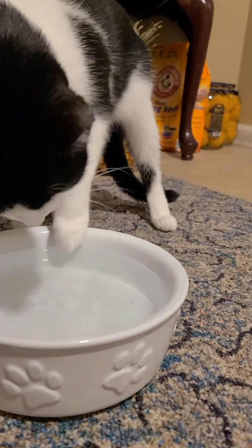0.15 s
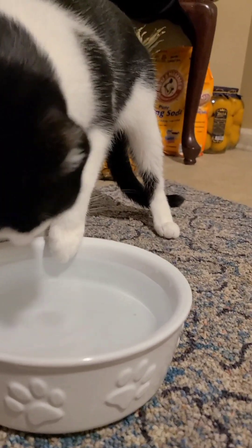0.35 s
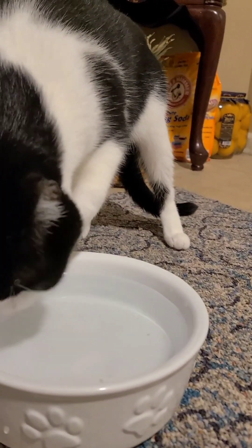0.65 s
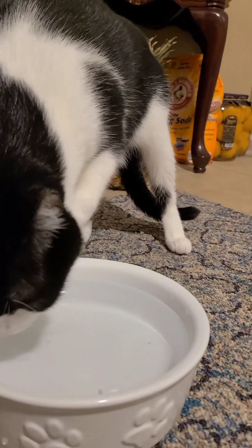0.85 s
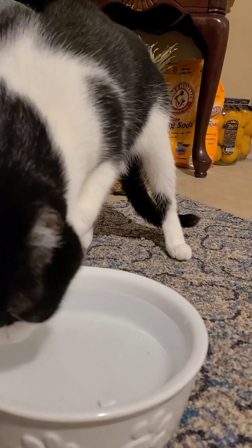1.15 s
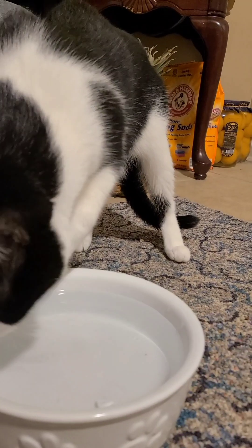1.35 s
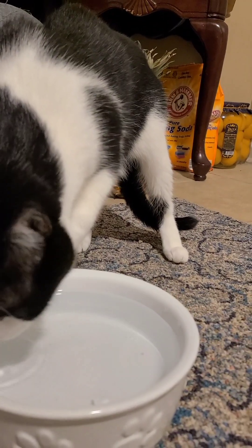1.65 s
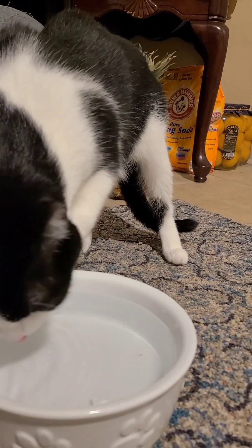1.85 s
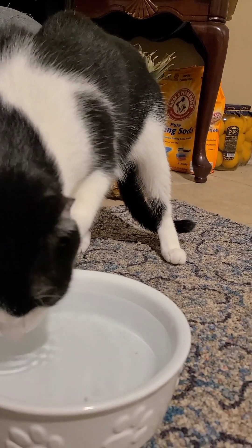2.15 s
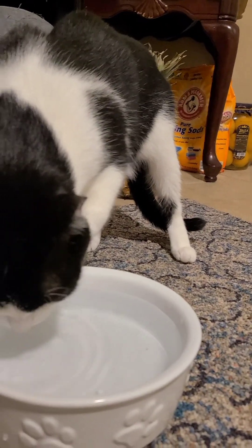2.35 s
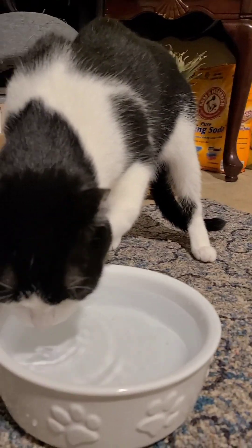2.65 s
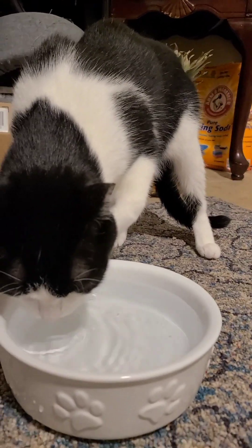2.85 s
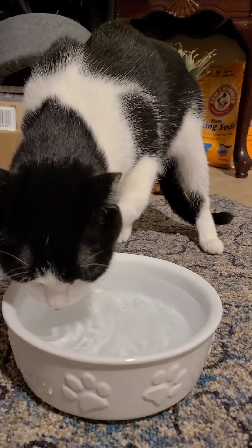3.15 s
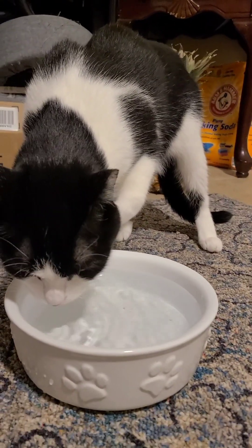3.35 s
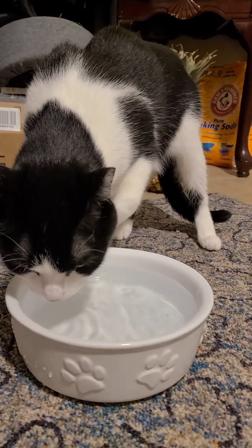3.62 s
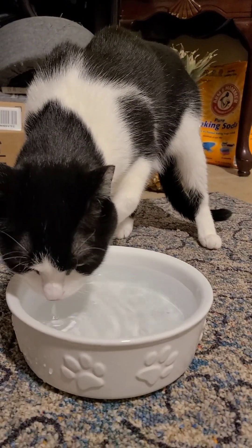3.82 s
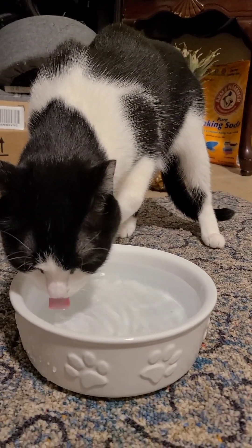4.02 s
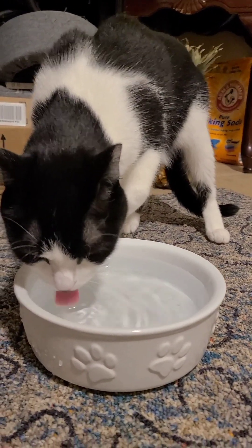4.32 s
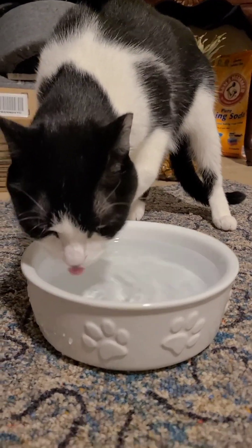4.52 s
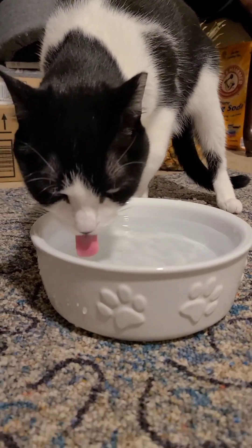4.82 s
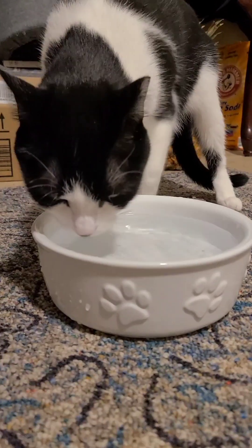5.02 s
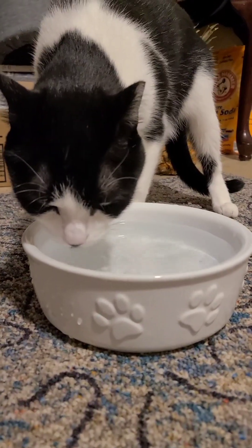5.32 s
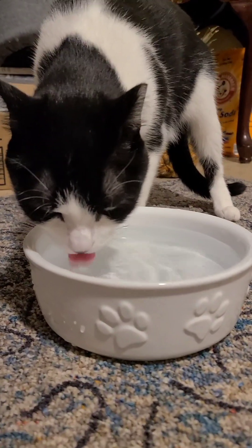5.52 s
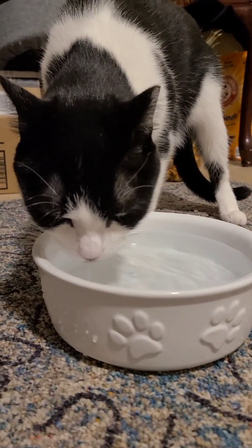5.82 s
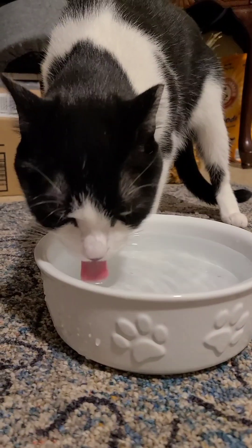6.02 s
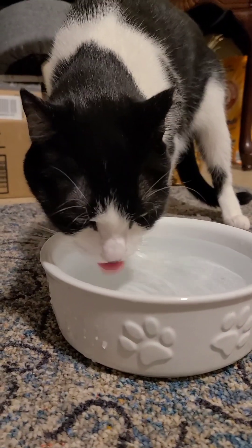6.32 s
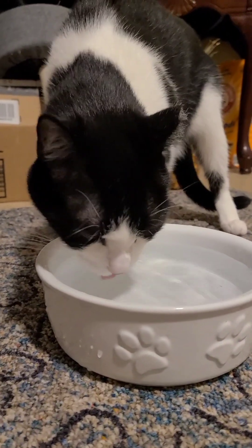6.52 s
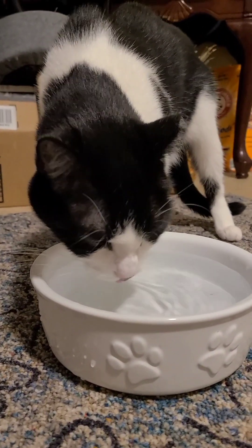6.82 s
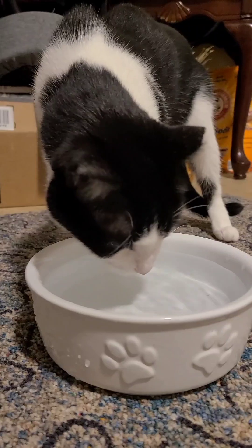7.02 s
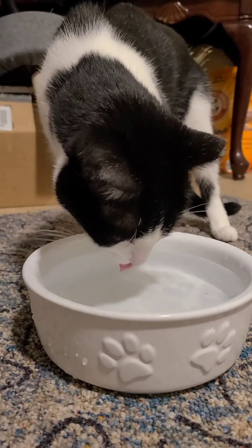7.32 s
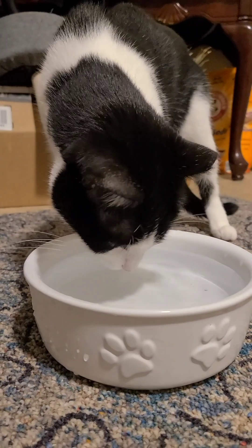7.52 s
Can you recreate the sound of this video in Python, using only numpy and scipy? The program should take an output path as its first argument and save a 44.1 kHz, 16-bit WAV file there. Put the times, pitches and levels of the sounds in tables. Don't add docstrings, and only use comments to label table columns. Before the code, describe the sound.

Steady low mains hum and soft rumble fill a quiet domestic room. Close to a stereo phone, a cat's tongue makes short wet plops a few times per second, irregular in strength. Bright drips and tiny high clicks cluster mid-way, with brief faint bowl rings and bubble burbles. A faint fan tone rises after the middle; lapping stops almost entirely in the last half second, leaving hum.

```python
import sys
import numpy as np
from scipy import signal
from scipy.fft import rfft, irfft
from scipy.io import wavfile
from scipy.ndimage import uniform_filter1d

SR = 44100
rng = np.random.default_rng(int(sys.argv[2]) if len(sys.argv) > 2 else 0)


def pcm_store(signal):
    levels = np.round(np.clip(np.atleast_2d(signal), -1, 1) * 32767)
    wavfile.write(sys.argv[1], SR, levels.astype(np.int16).T)


def voltage_ratio(decibels):
    exponent = np.asarray(decibels, float) / 20
    return 10 ** exponent


N = 337982
TIME = np.arange(N) / SR
FREQ = np.maximum(np.arange(N // 2 + 1) * SR / N, 1)
TOP_HZ = 15740
POP_LAG_S, DROP_LAG_S, SNAP_LAG_S = -.00005, 0, .00003
MOUTH_PAN_DB, PAN_SCATTER_DB = -4, 3.5


def level(x, db):
    return x * voltage_ratio(db) / np.sqrt(np.mean(x ** 2))


def along(table):
    hz, value = np.transpose(table)
    return np.interp(np.log(FREQ), np.log(hz), value)


def sides(pan_db):
    return voltage_ratio(np.array([[.5], [-.5]]) * pan_db)


def walk(rate_hz):
    hold = int(SR / rate_hz)
    steps = np.repeat(rng.standard_normal(N // hold + 1), hold)
    slewed = uniform_filter1d(uniform_filter1d(steps, hold), hold)
    return 1.3 * slewed[:N]


# f/Hz, likeness/0-1
PORT_LIKENESS = [(60, 0.94), (130, 1), (290, 0.95), (640, 0.06), (1410, 0), (3100, 0), (6820, 0.28),
                 (15000, 0.05)]
# f/Hz, left minus right/dB
PORT_BALANCE = [(60, -2.5), (110, -4.5), (200, -5.5), (380, -4.5), (700, -4), (1290, 0), (2380, 2),
                (4400, -1), (8120, 9), (15000, -7.5)]


def stereo_noise(gain):
    like = np.clip(along(PORT_LIKENESS), -1, 1)
    mid, side = rfft(rng.standard_normal((2, N)))
    pair = np.sqrt(1 + like) * mid + np.sqrt(1 - like) * side * np.array([[1], [-1]])
    return irfft(pair * gain * sides(along(PORT_BALANCE)), N)


# f/Hz, density/dB per Hz
RUMBLE_COLOUR = [(28, -11.5), (43, -1), (52, -12), (70, -3), (90, -6.5), (138, -2.5), (160, -8), (225, -10),
                 (270, -12), (310, -13.5), (335, -15.5), (400, -17), (560, -20.5)]
# t/s, level/dB
RUMBLE_SWELL = [
    (0, -61.5),
    (4.2, -63.5),
    (4.8, -59.5),
    (7.3, -60.5),
    (7.55, -58),
    (7.66, -56.5),
]


def room_rumble():
    colour = voltage_ratio(along(RUMBLE_COLOUR)) / (1 + (FREQ / 620) ** 8)
    upper = 1 / (1 + (185 / FREQ) ** 8)
    s, db = np.transpose(RUMBLE_SWELL)
    swell = voltage_ratio(np.interp(TIME, s, db - db.mean()))
    steady = stereo_noise(colour * (1 - upper))
    return level(steady + swell * stereo_noise(colour * upper), -54.5)


# f/Hz, density/dB per Hz
AIR_COLOUR = [(290, 6), (500, -6.5), (727, -3.5), (916, -10), (1280, -7.5), (1590, -13), (1800, -12),
              (2510, -13), (2950, -14), (3610, -15.5), (5100, -16), (6150, -8.5), (8090, -31),
              (12100, -29.5), (15700, -31.5)]
# f/Hz, width/Hz, gain/dB
PORT_PEAKS = [(1070, 120, 1.5), (2997, 130, 7.5), (6030, 87, 4.5), (12200, 2200, 4), (7460, 810, 5)]


def air_hiss():
    peaks_db = sum(db / (1 + (2 * (FREQ - hz) / width_hz) ** 2) for hz, width_hz, db in PORT_PEAKS)
    hiss = stereo_noise(voltage_ratio(along(AIR_COLOUR) + peaks_db) / (1 + (520 / FREQ) ** 8))
    return level(hiss, -65.5) * voltage_ratio(.3 * walk(12))


def tone(hz, db, pan_db, wander_db, rate_hz=3.015):
    turns = np.cumsum(hz * np.ones(N)) / SR
    phase = 2 * np.pi * turns + 0.015 * wander_db * walk(rate_hz) + 2 * np.pi * rng.random()
    strength = np.sqrt(2) * voltage_ratio(db + wander_db * walk(rate_hz))
    return strength * np.sin(phase) * sides(pan_db)


# multiple of twice mains, rms level/dB, left minus right/dB, wander/dB
HUM = [
    (1, -45.8, -2.1, .45),
    (2, -67, -6, 1.1),
    (3, -74.5, -6, 3),
]


def mains_hum(twice_mains_hz=120):
    return sum(tone(k * twice_mains_hz, *rest) for k, *rest in HUM)


# f/Hz, rms level/dB, left minus right/dB, wander/dB, optional wander rate/Hz
MOTOR = [(58.4, -60.5, -1.5, 1.5), (176.4, -70, -3, 3, 9.0), (467.5, -75.5, -2.2, 1.1),
         (270, -78, -4, 3, 8.0)]


def motor_drone():
    return sum(tone(*row) for row in MOTOR)


# t/s, shaft f/Hz, rms level/dB, overtone re shaft/dB
FAN = [
    (0, 206.5, -74, -8),
    (2.5, 205, -76, -8),
    (4.2, 204.6, -76, -8),
    (4.8, 204, -65, -12),
    (6, 203.6, -67, -9),
    (7.66, 203.3, -67, -5),
]


def late_fan():
    s, *columns = np.transpose(FAN)
    hz, db, over_db = (np.interp(TIME, s, c) for c in columns)
    return tone(hz, db, -3.3, 1.5) + tone(2 * hz, db + over_db, -4, 1.5)


def bursts(table, lag_s, rise, glide, rough, stretch=1, size=512):
    out, t = np.zeros((2, N + size)), np.arange(size) / SR
    grit = rng.standard_normal((len(table), 2, size))
    grit = uniform_filter1d(uniform_filter1d(grit, size=size // 56), size=size // 56)
    for (s, db, hz, cycles, pan_db), noise in zip(table, grit / grit.std()):
        turns = np.maximum(hz * (t - np.array([[0], [lag_s]])), 0)
        life = turns / max(stretch * cycles, .6)
        shape = (1 - np.exp(-(life / rise) ** 2)) * np.exp(-3 * life)
        swing = -np.sin(2 * np.pi * turns * (1 + glide * (np.minimum(life, 2) - .5)))
        at = int(s * SR)
        envelope = voltage_ratio(db) * sides(pan_db) * shape / shape.max()
        out[:, at:at + size] += envelope * swing * (1 + rough * noise)
    return out[:, :N]


def pops_of(table):
    s, db, hz, cycles = np.transpose(table)
    pan_db = MOUTH_PAN_DB + PAN_SCATTER_DB * (2 * rng.random(len(s)) - 1)
    return np.transpose([s, db, hz, cycles, pan_db])


def ticks_of(table):
    s, db, hz, pan_db = np.transpose(table)
    cycles = np.minimum(4.44 * 2 ** ((-43 - db) / 8), 6.5)
    return np.transpose([s, db, hz, cycles, pan_db])


def aftermath(rows, under_db, within_s, octaves, cycles, count):
    s, db, hz, _, pan_db = np.repeat(rows, count, axis=0).T
    late, pitch, pan = rng.random((len(s), 3)).T
    shed_s = s + .003 + within_s * late
    shed_db = db + under_db - 6 * late
    shed_hz = np.minimum(hz * 2 ** (octaves * (2 * pitch - 1)), TOP_HZ)
    shed_pan_db = pan_db + PAN_SCATTER_DB * (2 * pan - 1)
    shed = np.transpose([shed_s, shed_db, shed_hz, np.full(len(s), cycles), shed_pan_db])
    return np.vstack([rows, shed])


# t/s, tick level/dB
SPRAY = [
    (0, -75),
    (2.8, -77.5),
    (3.5, -71),
    (4.1, -77.5),
    (4.93, -69.5),
    (5.3, -72.5),
    (6.6, -73.5),
    (7.2, -74.5),
]


def crackle(count=1100):
    place, pitch, pan = rng.random((3, count))
    s = place * TIME[-1]
    size_db = np.minimum(3 * rng.exponential(size=count), 10)
    db = np.interp(s, *np.transpose(SPRAY)) + size_db
    rows = np.transpose([s, db, 6800 * 2 ** (1.15 * pitch), np.full(count, 8.5), 14 * pan - 9])
    return bursts(rows, SNAP_LAG_S, rise=0.69, glide=0.01, rough=0.6, size=256)


# t/s, length/s, centre f/Hz, spread/octaves, peak level/dB
SLOSH = [(.235, 0.044, 2580, 0.27, -71), (1.611, 0.06, 2500, 0.32, -65), (1.935, 0.061, 2540, 0.27, -68),
         (2.584, 0.034, 2820, 0.3, -71), (4.289, 0.052, 2600, 0.27, -68), (4.99, 0.072, 2560, 0.33, -66.5),
         (6.02, .03, 2000, 0.3, -71), (6.13, 0.051, 4620, .2, -61), (6.283, 0.067, 1900, 0.5, -63),
         (6.635, .05, 2800, .3, -70), (3.429, 0.033, 1410, .3, -70), (6.79, .05, 3000, .2, -72),
         (4.465, 0.059, 1500, 0.58, -69), (7.561, 0.037, 1690, 0.34, -72)]


def slosh(count=24):
    rows = []
    for s, length_s, hz, octaves, db in SLOSH:
        place = rng.random(count)
        pitch, size, pan = rng.standard_normal((3, count))
        bubble_db = db - 24 * (place - .4) ** 2 + 2 * size
        bubble_hz = np.minimum(hz * 2 ** (octaves * pitch), TOP_HZ)
        cycles = np.full(count, hz * 0.0039)
        rows += zip(s + length_s * place, bubble_db, bubble_hz, cycles, 4 * pan - 2)
    return bursts(rows, POP_LAG_S, rise=0.4, glide=0.1, rough=0.6)


# t/s, peak level/dB, f/Hz, decay/cycles, left minus right/dB
RINGS = [(.9905, -58, 2040, 60, -5), (1.626, -62, 2400, 50, -2), (2.722, -63, 4600, 30, -5),
         (3.501, -60, 2110, 18, 5), (3.74, -64, 2050, 90, 0), (4.31, -66, 2170, 210, 3),
         (4.32, -65, 3750, 110, -2), (4.786, -64, 1470, 170, 1), (5.067, -52, 1286, 26, -12),
         (5.068, -58, 1750, 45, -8), (5.067, -60, 840, 16, -6), (6.972, -60, 1200, 10, -3),
         (6.80, -60, 410, 40, -4)]


def bowl_rings():
    return bursts(RINGS, POP_LAG_S, rise=.1, glide=.003, rough=.6, size=4096)


# t/s, peak level/dB, f/Hz, left minus right/dB
SNAPS = [(.2557, -63, 10260, -12), (1.2863, -65, 11300, -8), (2.2062, -59, 11830, -5),
         (2.7205, -61, 10530, -10), (2.9253, -63, 12500, -12), (3.6177, -59, 12350, -1.5),
         (4.3722, -69, 11000, -12), (4.46, -61, 12900, -16), (4.465, -43, 10900, -2),
         (4.5926, -60, 12940, -5), (4.8652, -63, 12840, -7), (4.9516, -66, 12200, .3),
         (5.4065, -54, 10700, 0), (5.4968, -61, 10000, -5), (5.7027, -61, 10000, -1.5),
         (5.707, -63, 10600, -1), (6.0141, -64, 12150, -2.5), (6.0184, -46, 12000, -1),
         (6.1194, -67, 10460, 1.5), (6.5549, -61, 12200, -4), (6.6327, -53.5, 10900, -10),
         (6.8706, -57, 14250, 4), (6.9698, -54, 12280, -4), (3.2058, -64, 12600, 3), (4.61, -69, 12000, -4),
         (4.701, -64, 11500, -5), (4.735, -68, 10800, -1), (6.345, -68, 10600, -4), (6.439, -61, 12200, -4),
         (6.749, -57, 12400, 3)]


def film_snaps():
    films = aftermath(ticks_of(SNAPS), under_db=-19, within_s=0.027, octaves=0.1, cycles=13, count=5)
    return voltage_ratio(-1.5) * bursts(films, SNAP_LAG_S, rise=0.24, glide=0.0095, rough=1.0, stretch=3.1)


# t/s, peak level/dB, f/Hz, left minus right/dB
DROPS = [(.243, -59, 7450, 8), (.7679, -61, 6500, 9), (1.1112, -53, 7350, 8), (2.2038, -58, 4530, -9),
         (2.6299, -51, 5700, -3), (2.9243, -56, 7730, 9), (3.1537, -45.5, 4700, -2), (3.202, -50, 6600, -3),
         (3.3099, -50, 6100, -4), (3.3555, -42, 4820, -6), (3.397, -56, 3800, -4),
         (3.4121, -50, 6530, -2.5), (3.508, -50, 5900, -8), (3.5615, -58, 4170, -10),
         (3.6055, -47.5, 6860, -11), (3.7284, -49, 5950, -5), (3.7781, -54, 4140, -11),
         (3.7933, -50, 4600, -4), (4.1393, -53, 4200, -9), (4.1459, -42, 5040, -7), (4.4031, -53, 4150, -8),
         (4.4786, -52, 6700, -3), (4.6784, -55, 3970, -2.5), (4.6889, -49, 4480, -6), (4.465, -52, 6860, 2),
         (6.1256, -42, 4700, 2), (6.6322, -56, 7200, 9), (6.7427, -50, 7250, 8), (6.7489, -61, 5850, 1),
         (6.9681, -50.5, 7460, 9), (3.1955, -55, 7550, 0), (3.1955, -58, 4280, -3), (3.203, -60, 5000, -3),
         (4.4031, -54, 5800, 0), (6.04, -55, 5800, 0), (6.127, -47, 5800, 7), (6.138, -52, 4400, -2),
         (6.14, -57, 5400, 0), (6.392, -54, 6800, 3), (6.345, -59, 7100, 3), (6.75, -56, 4400, -1),
         (6.811, -58, 5530, 0), (4.465, -57, 4230, -3), (4.479, -60, 3400, -3), (5.258, -64, 4600, -3),
         (.633, -67, 4300, -1), (1.256, -66, 3800, -3), (2.7205, -61, 4600, -4)]


def droplet_ticks():
    droplets = aftermath(ticks_of(DROPS), under_db=-19, within_s=.012, octaves=0.2, cycles=12, count=1)
    return voltage_ratio(-1.5) * bursts(droplets, DROP_LAG_S, rise=.5, glide=.02, rough=.2, stretch=1.3)


# t/s, peak level/dB, f/Hz, decay/cycles
BLIPS = [(1.628, -67, 2120, 5.4), (1.644, -61, 2200, 6), (3.349, -52, 4100, 12), (3.349, -56, 5100, 9),
         (3.349, -61, 6200, 10), (3.3555, -53, 3200, 6.5), (3.361, -59, 4500, 8), (3.364, -60, 2080, 8),
         (4.6785, -54, 5830, 11), (4.684, -52, 4140, 8), (4.6885, -53, 5600, 12), (4.693, -56, 2010, 5),
         (4.7805, -50, 1330, 9), (4.813, -59, 2300, 4), (6.281, -57, 800, 4.8), (6.288, -62, 2500, 6),
         (6.293, -63, 3420, 14), (6.298, -59, 1200, 5), (6.300, -61, 3420, 12), (6.302, -58, 2400, 6),
         (6.306, -58, 2200, 7), (6.308, -62.5, 3850, 30), (6.310, -59, 1850, 7.4), (6.311, -58, 1030, 6),
         (6.321, -57, 2060, 7.4), (6.325, -60, 1330, 4.3), (6.331, -60, 1870, 7), (6.335, -61, 2220, 6),
         (6.340, -58, 1200, 3.2), (6.345, -59, 2250, 12), (6.392, -63, 2880, 12), (6.616, -60, 2970, 8.8),
         (6.630, -56, 2700, 3), (6.6375, -53, 2200, 3.1), (6.644, -57, 2900, 5), (6.665, -60, 4250, 8),
         (6.957, -65, 3450, 12), (6.9685, -53.5, 1230, 4.1), (6.978, -63, 2050, 5), (5.409, -62, 2330, 14),
         (6.632, -51, 1150, 3.1), (6.81, -56, 700, 1.8), (6.018, -62, 2000, 20), (3.178, -58, 2500, 6),
         (3.144, -61, 3000, 5), (3.427, -61, 2360, 5), (4.4795, -61, 2100, 5.5), (6.678, -61, 3800, 12),
         (6.04, -61, 2300, 6), (5.998, -60, 3400, 3)]


def bubble_blips():
    return bursts(pops_of(BLIPS), POP_LAG_S, rise=.5, glide=.03, rough=.15)


# t/s, peak level/dB, f/Hz, decay/cycles
POPS = [(.2274, -46.5, 2140, 1.2), (.9899, -45, 1580, 2.8), (1.6228, -44.5, 1840, 1.7),
        (1.8385, -51.5, 1690, 1.3), (1.9248, -51, 2050, 1.9), (2.3407, -51.5, 1160, 2),
        (3.1878, -42, 1070, 1.23), (3.349, -48, 2700, 2.4), (3.4285, -51.5, 1350, 1.6),
        (3.7929, -53.5, 2010, 2.6), (4.103, -47.5, 1150, 1.1), (4.4637, -44.5, 880, 1.5),
        (4.4793, -46, 1500, 0.49), (4.6783, -50.5, 1960, 4.6), (4.6843, -51.5, 2450, 5.9),
        (4.778, -38.5, 1350, 2.7), (4.9941, -47, 2110, 1.4), (5.0698, -42.5, 1470, 1.9),
        (5.391, -45, 1540, 0.9), (5.4068, -37.5, 1330, 0.97), (5.5526, -51, 1080, 1.3),
        (5.9442, -46, 1580, 0.8), (6.0135, -40.5, 1710, 0.57), (6.281, -44.5, 2300, 0.76),
        (6.6325, -37.5, 2350, 1.07), (6.8095, -52, 2650, 3.2), (6.9678, -48, 1450, 1.1),
        (6.9764, -54, 3400, 4.6)]
# t/s, peak level/dB, f/Hz, decay/cycles
SMACKS = [(.188, -58, 1350, 2), (.633, -59, 1900, 2.7), (1.256, -53.5, 1690, 1.2), (1.601, -50, 2400, 1.2),
          (1.6352, -56, 2300, 8), (1.9419, -56, 2270, 3.4), (2.254, -46.5, 1900, 0.66),
          (2.54, -58, 1480, 3.7), (2.579, -51, 1880, 1.4), (2.69, -58, 1200, 2.4), (2.86, -63, 1300, 2.2),
          (3.4255, -52, 1400, 1.6), (3.5859, -55.5, 2420, 3.6), (3.7244, -57, 1940, 7.1),
          (3.7395, -58, 1890, 5.4), (4.4945, -58, 2140, 5.6), (4.7336, -53, 1250, 2.2),
          (4.7692, -57, 1250, 6.3), (4.812, -54, 800, 2.1), (5.0668, -39.5, 1100, 0.86),
          (5.6127, -48, 2560, 1.8), (5.76, -53, 885, 2.3), (5.8578, -48.5, 2700, 1.2),
          (6.1188, -54, 2340, 6.3), (6.3812, -56, 3200, 2.6), (7.4905, -54, 1130, 1.8),
          (7.566, -55.5, 1630, 1.9), (3.994, -52.5, 1400, 0.9), (5.306, -60, 3080, 4),
          (5.7015, -57, 890, 2.3)]


def tongue_pops(echo_s=.00124, echo_db=-7):
    pops = aftermath(pops_of(POPS), under_db=-28.0, within_s=0.01, octaves=0.2, cycles=0.93, count=2)
    pockets = np.vstack([pops, pops_of(SMACKS)])
    bare = bursts(pockets, POP_LAG_S, rise=.35, glide=.08, rough=.15, stretch=1.15)
    echo = np.roll(bare, int(echo_s * SR), axis=1)
    return voltage_ratio(-0.5) * (bare - voltage_ratio(echo_db) * echo)


def echoes(t60_s, patchy_db=4, gap_s=.0025):
    t = TIME[:SR // 4]
    patches = np.repeat(rng.standard_normal((2, len(t) // 32 + 1)), 32, axis=1)[:, :len(t)]
    scatter = rng.standard_normal((2, len(t))) * voltage_ratio(patchy_db * patches)
    tail = scatter * 1000. ** (-t / t60_s) * np.clip(t / gap_s - .5, 0, 1)
    return tail / np.sqrt(np.sum(tail ** 2, axis=1, keepdims=True))


def lapping():
    pops = tongue_pops() + bubble_blips() + slosh()
    ticks = droplet_ticks() + film_snaps() + crackle()
    low_room = voltage_ratio(-5.5) * signal.fftconvolve(pops, echoes(t60_s=0.13), axes=1)
    high_room = voltage_ratio(-5) * signal.fftconvolve(ticks, echoes(t60_s=0.09), axes=1)
    return pops + bowl_rings() + ticks + (low_room + high_room)[:, :N]


def scene():
    air = room_rumble() + air_hiss()
    fridge = mains_hum() + motor_drone() + late_fan()
    return air + fridge + lapping()


def band_limit(x):
    return signal.sosfilt(signal.butter(12, 15990, fs=SR, output="sos"), x)


def record(dry):
    notch_hz, width_hz, depth_db = 9050, 800, -7
    notch_db = depth_db / (1 + (2 * (FREQ - notch_hz) / width_hz) ** 2)
    heard = irfft(rfft(dry) * voltage_ratio(notch_db) * (FREQ < TOP_HZ), N)
    return band_limit(heard)


dry = scene()
out = record(dry)
pcm_store(out)
```